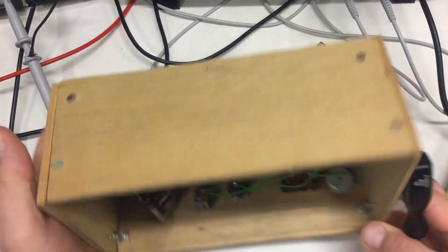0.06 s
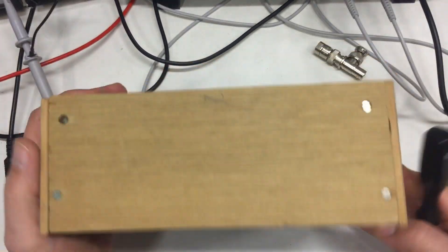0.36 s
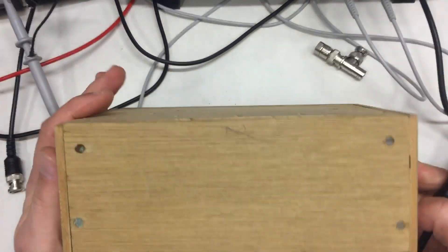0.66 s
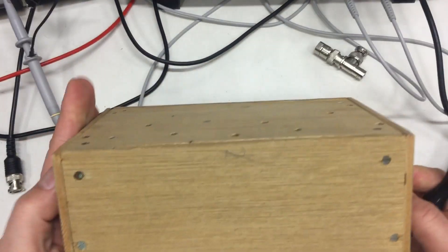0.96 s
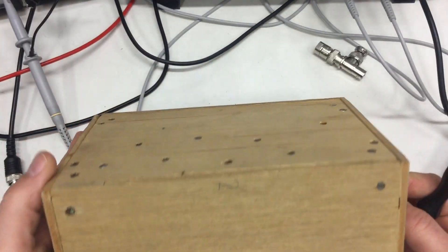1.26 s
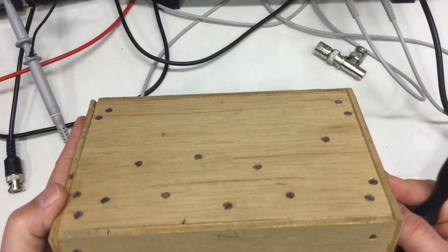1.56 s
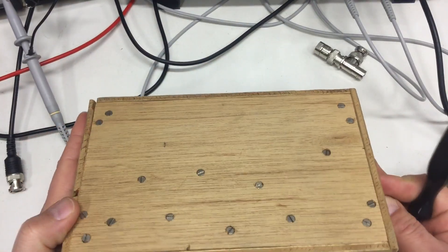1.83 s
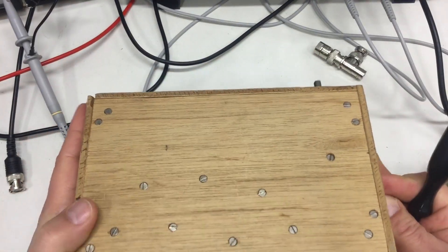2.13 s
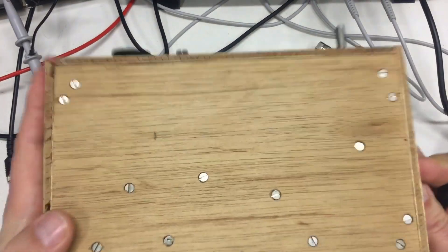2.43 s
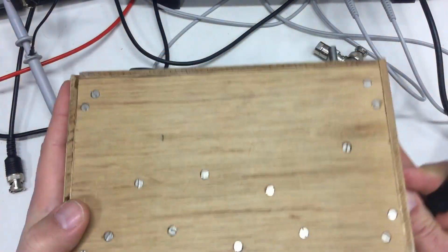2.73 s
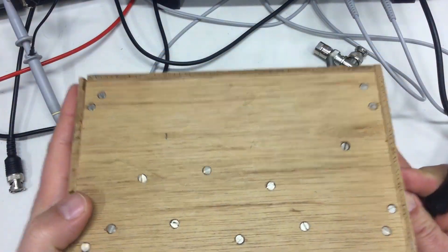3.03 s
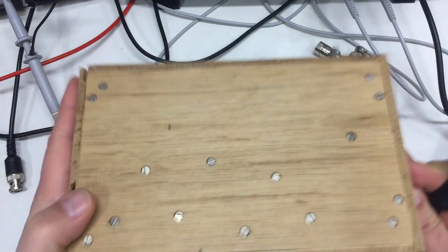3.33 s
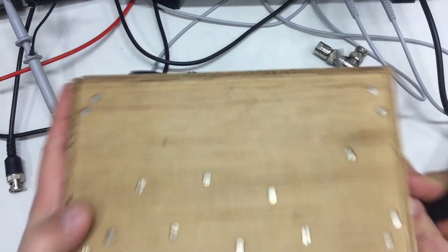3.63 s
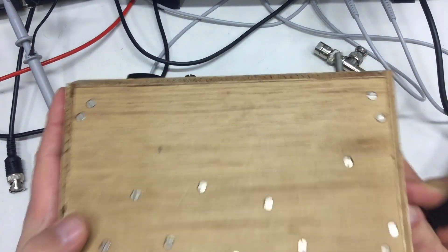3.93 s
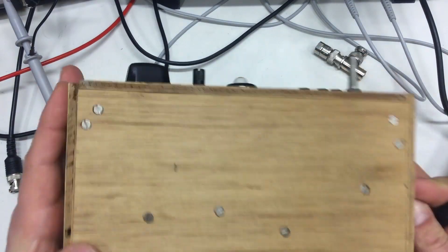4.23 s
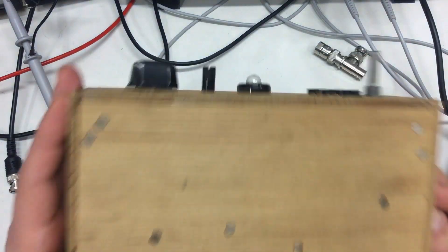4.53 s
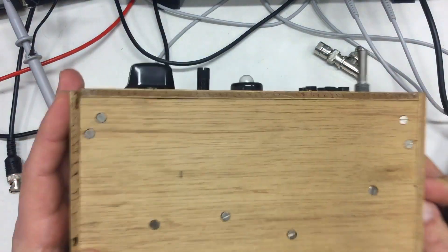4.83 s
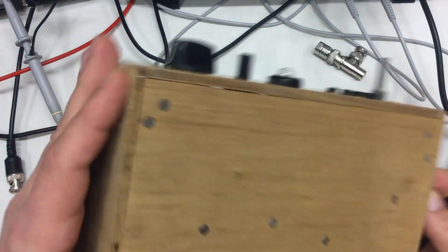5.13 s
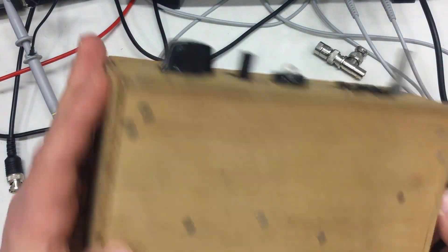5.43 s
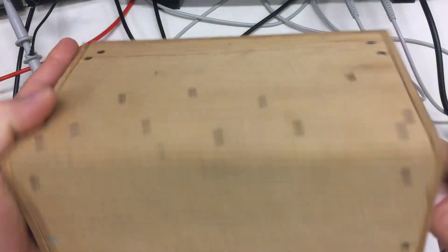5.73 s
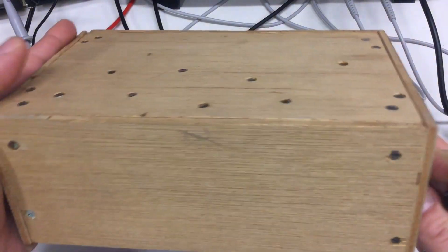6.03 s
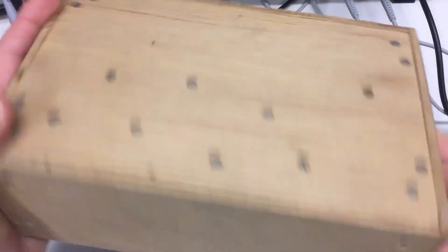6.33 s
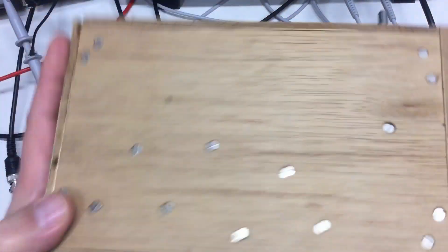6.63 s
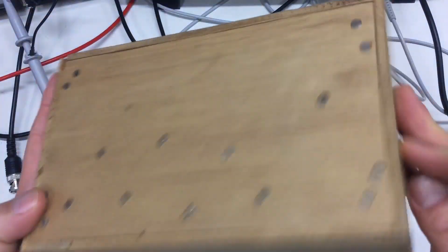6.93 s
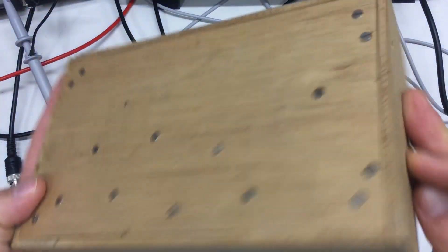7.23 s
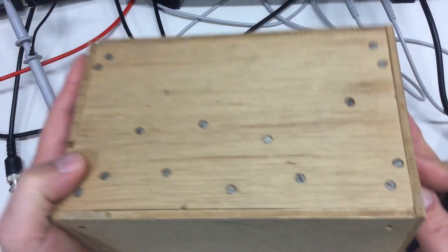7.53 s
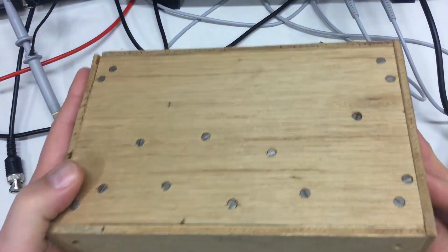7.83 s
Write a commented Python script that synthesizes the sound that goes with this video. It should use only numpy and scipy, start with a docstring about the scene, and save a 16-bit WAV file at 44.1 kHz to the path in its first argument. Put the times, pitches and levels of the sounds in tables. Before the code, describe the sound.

A hollow wooden box is turned over in the hands, close to the microphone in a quiet room, heard on the left only. In the first second, loose metal hardware slides and clinks against the panels, with several dull, hollow knocks. Another small rattle comes around 1.7 to 2.1 seconds. From 2.5 to 3.1 seconds the parts skid and bounce more sharply, with a thin, high ring. Then it eases to faint ticks and taps, with fingers and palms softly brushing the wood. At 5.9 seconds a sharp clink rings brightly and bounces a few times. Light taps lead into a last tumble from 7 to 7.6 seconds, with the hardest hit at about 7.2 and thin ringing trailing after it. A brief rub of the hand comes near 7.8 seconds. A faint low rumble lies underneath throughout.

```python
"""Wooden box with loose hardware

A hollow wooden box is turned over in the hands above a bench, close to one microphone. A loose bracket
and nuts slide, drop and bounce against its panels, and ring thinly while they tumble free. There are a
few duller knocks, and fingers rub on the wood. Only the left channel carries sound."""
import sys
import numpy as np
from scipy import signal
from scipy.fft import rfft, irfft
from scipy.io import wavfile
from scipy.ndimage import uniform_filter1d

SR = 44100
rng = np.random.default_rng(int(sys.argv[2]) if len(sys.argv) > 2 else 0)


def log_audio(samples):
    """Write samples as a 16-bit WAV file to the path given in sys.argv[1]."""
    # one column per channel
    frames = np.atleast_2d(samples).T
    # limit to full scale, then quantise
    limited = np.clip(frames, -1, 1)
    pcm = np.round(limited * 32767).astype(np.int16)
    wavfile.write(sys.argv[1], SR, pcm)


N = 352171
TIME = np.arange(N) / SR


def gain_of(db):
    """Decibels to amplitude."""
    return 10 ** (np.asarray(db) / 20)


def unit_rms(x):
    """Scales to an rms of one."""
    return x / np.sqrt(np.mean(x ** 2) + 1e-20)


def curve_at(points, hz):
    """Reads a curve on a log-frequency axis."""
    point_hz, value = np.transpose(points)
    return np.interp(np.log(hz + 1), np.log(point_hz + 1), value)


def add(mix, start_s, sound):
    """Mixes a sound in at its start time."""
    part = mix[max(round(start_s * SR), 0):][:len(sound)]
    part += sound[:len(part)]


def band(x, low_hz, high_hz, order=3):
    """Causal band-pass along the last axis."""
    return signal.sosfilt(signal.butter(order, [low_hz, high_hz], "band", fs=SR, output="sos"), x)


def resonate(x, hz, width_hz):
    """One resonance with a peak gain of one."""
    return signal.lfilter(*signal.iirpeak(hz, hz / width_hz, fs=SR), x)


def equalise(x, curve):
    """Applies an EQ curve of (Hz, dB) points."""
    return irfft(rfft(x) * gain_of(curve_at(curve, np.fft.rfftfreq(len(x), 1 / SR))), len(x))


def drift(step_s, count=800):
    """A slow random curve that reaches a new value at every step."""
    return np.interp(TIME, step_s * np.arange(count), rng.standard_normal(count))


def at_level(bursts, db):
    """Sets the rms of the first 8 ms of each burst."""
    attack = bursts[..., :round(.008 * SR)]
    return bursts * gain_of(db) / np.sqrt(np.mean(attack ** 2, axis=-1, keepdims=True) + 1e-20)


# The fader ride of the rumble. Each row: time in seconds, level in dB.
RUMBLE_RIDE = [(0.0, -81), (0.64, -74), (1.78, -72.5), (2.53, -73), (3.25, -77), (3.58, -67), (4.25, -77),
               (4.67, -73), (4.89, -69.5), (5.71, -77.5), (6.09, -70), (6.78, -75.5), (7.3, -69),
               (7.99, -73)]
# The EQ of the rumble and of the room tone. Each row: frequency in Hz, gain in dB.
RUMBLE_EQ = [(15, -7), (40, -5), (66, 1), (95, -0.5), (125, -2), (155, -26), (300, -24.5), (600, -62.5)]
AIR_EQ = [(100, -1), (170, -4.5), (198, 15), (225, -11), (290, -15.5), (330, 15), (380, -17.5), (900, -9.5),
          (2000, -9.5), (3200, -16), (15000, -10.5)]


def background(rumble_trim_db=2, lumps_db=2, air_db=-72):
    """A bed of lumpy rumble from the moving hands and the room, with quiet room tone."""
    rumble_db = np.interp(TIME, *np.transpose(RUMBLE_RIDE)) + lumps_db * drift(step_s=.12)
    rumble = unit_rms(equalise(rng.standard_normal(N), RUMBLE_EQ))
    air = unit_rms(equalise(rng.standard_normal(N), AIR_EQ))
    return gain_of(rumble_db + rumble_trim_db) * rumble + gain_of(air_db) * air


# The tone of the reverb. Each row: frequency in Hz, gain in dB.
REVERB_EQ = [(150, -7.5), (600, -4), (1800, -10.5), (4000, -6.5), (8000, -10), (14000, -22.5)]
# Its length. Each row: frequency in Hz, t60 in seconds.
REVERB_DECAY = [(200, 0.33), (700, 0.26), (2000, 0.25), (6000, 0.22), (14000, 0.16)]


def reverb(ringing, rattle, build_s=0.003, early_db=4, early_s=0.02, turn_hz=.9, scatter=.13):
    """Dense reflections in the box and the room; three tails crossfade as the box turns."""
    out, turn = np.zeros(N), 2 * np.pi * turn_hz * TIME
    # Each micro-impact takes its own paths, so a rattle's tail is diffuse.
    wander = uniform_filter1d(scatter * np.cumsum(rng.standard_normal(N)), size=40)
    for side in 2 * np.pi * np.arange(3) / 3:
        hz, frame_s, noise = signal.stft(rng.standard_normal(SR // 2), SR, nperseg=256)
        decay = gain_of(-60 * frame_s / curve_at(REVERB_DECAY, hz)[:, None])
        tail = signal.istft(noise * decay, SR, nperseg=256)[1]
        t = np.arange(len(tail)) / SR
        tail *= (1 - np.exp(-(t / build_s) ** 2)) * gain_of(early_db * np.exp(-t / early_s))
        tail = equalise(tail / np.linalg.norm(tail), REVERB_EQ)
        send = ringing * np.cos(turn + side) + band(rattle * np.cos(wander + side), 380, 18000, order=2)
        out += np.sqrt(2 / 3) * signal.oaconvolve(send, tail[:SR * 2 // 5])[:N]
    return out


# The hollow voice of the box. Each row: mode frequency in Hz, level in dB, t60 in seconds.
BOX_MODES = [(199.3, -1, 0.22), (218, 3, 0.19), (250, 1, 0.1), (451, -4.5, 0.32), (587, -30, 0.15),
             (676, -5, 0.16), (910, -10.5, 0.12), (1008, -7.5, 0.27), (1126, -20, 0.152), (1394, -2, .15),
             (1570, -44, .14), (1760, -15, 0.29), (1897, -17.5, 0.14)]


def box_ring(lowest_hz=140):
    """The wooden box answers one blow; its ring is kept out of the deep bass."""
    t = np.arange(SR // 2) / SR
    modes = sum(gain_of(db - 60 * t / t60) * np.sin(2 * np.pi * hz * t) for hz, db, t60 in BOX_MODES)
    return band(modes, lowest_hz, 8000, order=2)


def through_box(x, ring_db):
    """A sound made on the panels also sets the box's modes ringing."""
    ring = box_ring()
    return x + gain_of(ring_db) * signal.oaconvolve(x, ring / np.linalg.norm(ring))[:N]


# A palm changes its grip. Each row: start and end in seconds, level in dB, low and high cut in Hz.
PALM_SWIPES = [(1.036, 1.383, -62.5, 1500, 12400), (4.14, 4.26, -67, 1970, 12150),
               (5.285, 5.394, -63, 1270, 6500), (5.393, 5.533, -61.5, 1500, 7000),
               (5.601, 5.83, -63, 1350, 5800), (6.253, 6.377, -63.5, 6940, 14000),
               (7.719, 7.842, -57.5, 485, 1760), (7.82, 7.898, -60.5, 900, 4840)]


def palm_swipes():
    """Skin slides smoothly along the wood: a soft swell of friction."""
    out = np.zeros(N)
    for start, end, db, low_hz, high_hz in PALM_SWIPES:
        friction = unit_rms(band(rng.standard_normal(SR // 2), low_hz, high_hz))
        friction = friction[:round((end - start) * SR)]
        add(out, start, gain_of(db) * friction * signal.windows.tukey(len(friction), .8))
    return out


# Loose parts skid as the box tilts. Each row: start and end in seconds, scrape and bounce levels in dB.
SKIDS = [(0.192, 0.431, -77, -56), (.6, 0.728, -51, -59), (.73, 0.885, -61, -54.5),
         (1.692, 1.904, -78, -59), (1.981, 2.056, -62, -71), (2.548, 2.658, -60, -55.5),
         (2.693, 2.956, -54.5, -68), (3.033, 3.126, -63, -64.5), (5.957, 6.203, -67, -55.5),
         (7.398, 7.628, -58, -61)]


def skid_envelope():
    """The scrape swells and fades as a part crosses a panel."""
    out = np.zeros(N)
    for start, end, db, _ in SKIDS:
        add(out, start, gain_of(db) * signal.windows.tukey(round((end - start) * SR), .8))
    return out


def light_contact(start, db, draws, hardness_db, depth_db, contact_s, scatter_db=4):
    """One row for clinks(), varied in force, hardness and the spot it strikes."""
    force, hard, wood, panel = draws
    db += scatter_db * (2 * force - 1)
    hardness_db += 2 * scatter_db * (2 * hard - 1)
    return start, db, hardness_db, depth_db, contact_s, 600 * 2 ** wood, 1650 + 450 * panel


def bounces(hops=4):
    """A skidding part hops a few times at random: rows for clinks()."""
    rows = []
    for start, end, _, db in SKIDS:
        for k, (when, *draws) in enumerate(rng.random((hops, 5))):
            landing = start + (end - start) * (k + when) / hops
            rows.append(light_contact(landing, db, draws, hardness_db=-3, depth_db=-7, contact_s=.0014))
    return rows


# How hard the fingers rub while they turn the box. Each row: time in seconds, level in dB.
RUB_RIDE = [(0, -48), (.07, -65.5), (.25, -50.5), (.45, -69), (.8, -69), (.95, -63.5), (1.22, -64),
            (1.55, -66.5), (1.88, -56.5), (2.13, -68.5), (2.5, -68.5), (2.85, -57), (3.15, -73),
            (3.58, -72), (3.82, -66), (4.25, -71.5), (4.72, -65.5), (5.25, -67), (5.56, -66), (5.82, -70.5),
            (6.08, -65.5), (6.28, -66.5), (6.62, -67.5), (7.08, -62.5), (7.45, -61), (7.679, -67.5),
            (7.99, -65.5)]
# The tone of friction on wood. Each row: frequency in Hz, gain in dB.
RUB_EQ = [(88, -31), (150, -0.5), (190, 3), (226, -9.5), (264, 1.5), (376, -5.5), (457, -3), (637, 0),
          (960, -4), (2020, -4), (2810, -15), (10200, -22.5), (16000, -8.5)]


def rubbing(slips_per_s=420, slip_share=0.88, slip_decay_s=0.012, slip_range_db=3.2):
    """Skin and metal slide over the wood grain in many tiny slips; the metal adds only rasp and hiss."""
    rub = gain_of(np.interp(TIME, *np.transpose(RUB_RIDE)) + drift(step_s=0.066))
    skid = skid_envelope()
    slipping = rng.random(N) < slips_per_s / SR
    slips = slipping * gain_of(slip_range_db * np.minimum(rng.exponential(1, N), np.pi))
    grip = unit_rms(signal.lfilter([1], [1, -np.exp(-1 / (slip_decay_s * SR))], slips))
    friction = equalise(rng.standard_normal(N) * (1 - slip_share + slip_share * grip), RUB_EQ)
    body = rub * unit_rms(through_box(band(friction, 237, 2400), ring_db=-19))
    rasp = np.hypot(gain_of(-7) * rub, skid) * unit_rms(band(friction, 2670, 8280, order=5))
    hiss = np.hypot(gain_of(-8) * rub, gain_of(-3) * skid) * unit_rms(band(friction, 7670, 12000, 5))
    return body + rasp + hiss


def jostles(count=36, over_rub_db=3):
    """Fingertips and shifting parts tap faintly, as hard as the hands are working: rows for clinks()."""
    rows = []
    for k, (when, *draws) in enumerate(rng.random((count, 5))):
        start = (k + when) / count * N / SR
        db = np.interp(start, *np.transpose(RUB_RIDE)) + over_rub_db
        rows.append(light_contact(start, db, draws, hardness_db=-12, depth_db=-1, contact_s=.0036))
    return rows


# Dull knocks with a short burst of low noise, and at 7.47 s a low rub played the same way; on two loud hits #
# it is the deep thud of the overloaded input. Each row: start in seconds, ring and burst levels in dB, burst #
# low cut in Hz, brightness in Hz, burst t60 in seconds, wall note in Hz, its level in dB.
KNOCKS = [(0.1542, -43, -32, 170, 1580, 0.12, 244, -43), (.167, -24.5, -42, 191, 1020, 0.031, 456, -35),
          (.21, -33.5, -44, 177, 800, 0.57, 205, -47), (.288, -30, -47, 190, 1470, .1, 253, -61),
          (0.6055, -24, -40, 257, 1290, 0.035, 433, -38), (0.615, -34, -35.5, 220, 1240, 0.23, 201, -34),
          (0.804, -29, -40, 151, 720, 0.11, 202.4, -41), (1.873, -35.5, -39.5, 184, 606, 0.017, 358, -42),
          (2.686, -52.5, -40, 45.1, 790, 0.071, 410, -42), (5.903, -65, -42.5, 55, 596, 0.021, 402, -41),
          (7.1836, -39, -47, 464, 1410, 0.067, 540, -42.5), (7.473, -72, -56, 128, 700, 0.43, 462, -58)]


def knocks(note_t60=0.13, ring_trim_db=-12.5):
    """A blow rings the box's modes, and the note of the struck wall, over a short burst of low noise."""
    t, ring, out = np.arange(SR // 2) / SR, box_ring(), np.zeros(N)
    for start, ring_db, burst_db, low_hz, bright_hz, t60, note_hz, note_db in KNOCKS:
        burst = band(rng.standard_normal(len(t)) * gain_of(-60 * t / t60), low_hz, bright_hz)
        body = signal.lfilter(*signal.butter(1, bright_hz, fs=SR), ring)
        note = gain_of(note_db - 60 * t / note_t60) * np.sin(2 * np.pi * note_hz * t)
        add(out, start, at_level(burst, burst_db) + gain_of(ring_db + ring_trim_db) * body + note)
    return out


# The pitches of the three loose metal parts. Each row: lower and upper mode in Hz.
PART_MODES = [(8439, 12992), (8802, 13488), (7607, 11233)]
# Their sustain. Each row: t60 of the lower and upper mode in seconds.
PART_DECAYS = [(0.75, .4), (0.29, 0.7), (1, 0.86)]
# Thin ringing between contacts. Each row: start and end in seconds, part index,
# levels of the lower and upper mode in dB, beat rate of the lower mode in Hz.
TUMBLES = [(.655, .765, 2, -42, -51, 12), (1.809, 1.84, 2, -68, -52, 18), (2.54, 2.687, 0, -49, -57, 23),
           (2.688, 2.714, 0, -35, -60, 28), (2.703, 2.821, 0, -41, -40, 9), (3.714, 3.76, 2, -63, -57, 18),
           (3.833, 3.865, 2, -70, -52, 18), (5.918, 6.037, 1, -30, -41, 33),
           (6.037, 6.104, 1, -50, -62, 14), (6.104, 6.19, 1, -49, -65, 12), (6.979, 7.18, 2, -64, -60, 14),
           (7.183, 7.24, 2, -46, -54, 20), (7.236, 7.363, 2, -47, -54, 15), (7.363, 7.606, 2, -52, -55, 14),
           (7.606, 7.81, 2, -53, -47, 11)]


def tumbling_metal(damping_s=0.0014, upper_beat_ratio=0.84, pair_share=.42):
    """A free part rings in two modes, turning its faces to and from the microphone, until it lands."""
    out = np.zeros(N)
    for start, end, part, lower_db, upper_db, beat_hz in TUMBLES:
        flight_s = end - start
        t = np.arange(0, flight_s + 10 * damping_s, 1 / SR)
        gate = (1 - np.exp(-t / damping_s)) * np.exp(-np.maximum(t - flight_s, 0) / damping_s)
        rates = beat_hz, beat_hz * upper_beat_ratio
        for hz, t60, db, rate in zip(PART_MODES[part], PART_DECAYS[part], (lower_db, upper_db), rates):
            spin = np.exp(1j * np.pi * rate * t)
            pair = (1 - pair_share) / spin - pair_share * spin  # spin splits a mode into a beating pair
            tone = np.sqrt(2) * (pair * np.exp(2j * np.pi * (hz * t + rng.random()))).real
            add(out, start, gain_of(db - 60 * t / t60) * gate * tone)
    return out


# The four layers of a clink: wood, panel, clack, tick. Each row: low and high cut in Hz,
# t60 in seconds, resonance width in Hz, resonance level over the noise in dB.
CLINK_LAYERS = [(415, 1860, 0.044, 48, 4), (1470, 2490, 0.086, 140, 7.5), (2780, 7300, 0.02, 270, -7.5),
                (7560, 14200, 0.0049, 2500, -5)]
# Metal strikes the panels; hardness lifts the tick and clack, depth lifts the low wood. Each row: start
# in seconds, strength, hardness and depth in dB, contact time in seconds, wood and panel notes in Hz.
CLINKS = [(0.154, -46, -3, 12.5, 0.0027, 600, 1640), (0.1743, -47, -1, 12, 0.0024, 664, 1570),
          (0.2876, -30.5, -9, -5.5, 0.0015, 670, 2500), (0.3482, -48.5, 9, -7, 0.0021, 680, 2020),
          (0.4188, -54, -20, -2, 0.0022, 650, 2530), (0.5012, -49, -53, -5, 0.0079, 674, 1720),
          (0.526, -54.5, -30, -11.5, 0.0027, 1240, 1700), (0.574, -58.5, 17.5, 10, 0.0037, 650, 1530),
          (0.5873, -41, 10, -7, 0.0016, 670, 1590), (0.6052, -38, -5.5, 9, 0.0072, 973, 1440),
          (0.6152, -41.5, 3, 2, 0.012, 670, 1480), (0.635, -45.5, 7, -1.5, 0.009, 670, 1970),
          (0.6535, -51, 11, 5, 0.004, 920, 1420), (0.6613, -46, 4.5, -3, 0.0011, 635, 1670),
          (0.702, -53, 6, -10, 0.0022, 540, 2740), (0.7286, -48.5, 4, -3, 0.0005, 1060, 2040),
          (0.7628, -50, -1, -3, 0.0011, 1100, 1990), (0.7885, -47, 12.5, -6, 0.00085, 1070, 1710),
          (0.8303, -47, -1, -1, 0.0012, 660, 2120), (1.7029, -55, -20, 2.5, 0.015, 625, 1810),
          (1.7495, -44.5, -2.5, -2.5, 0.0066, 624, 2230), (1.7646, -40.5, -14, -5.5, 0.0039, 1310, 2040),
          (1.7738, -56, -3, -15, 0.0025, 610, 1760), (1.8073, -48, -2.5, -15, 0.0038, 730, 1980),
          (1.8381, -46, -14, -13, 0.0068, 1260, 1720), (1.8473, -43.5, -14, -16, 0.0056, 880, 1690),
          (1.907, -37.5, 13, -7, 0.00074, 1360, 2140), (1.9645, -44.5, 3, -14, 0.0011, 1090, 1610),
          (2.0101, -51.5, 10.5, -15, 0.0015, 1090, 1580), (2.03, -62, 8, -4, 0.0011, 527, 1960),
          (2.049, -57, 8.5, -13, 0.0014, 1145, 2400), (2.0818, -61, 6, -11, 0.001, 536, 1970),
          (2.2948, -79, -32, 17.5, 0.0034, 980, 1800), (2.503, -53, -3, -8, 0.0036, 675, 1920),
          (2.5381, -48, 9, -9, 0.0024, 845, 2680), (2.5888, -40, 5, -12, 0.0042, 1320, 1780),
          (2.6027, -39, -28, -14, 0.0026, 690, 1830), (2.6873, -27, 4.5, -8, 0.0016, 875, 1950),
          (2.795, -38, 1, -1, 0.0015, 1320, 1610), (2.8208, -36, 15.5, -2.5, 0.00092, 1024, 1640),
          (2.8664, -42.5, -5, -25, 0.00091, 1070, 1660), (2.9547, -43.5, 17, -11.5, 0.0013, 580, 2390),
          (3.0344, -48.5, 18, -1, 0.0015, 1060, 1760), (3.0437, -48, 4, -7, 0.0012, 1080, 1790),
          (3.0692, -55, 2, -13, 0.0015, 1070, 1800), (3.0848, -57.5, 13.5, -3, 0.003, 1070, 1870),
          (3.1305, -58.5, 5.5, -6, 0.0048, 1030, 1880), (3.1762, -61, 11.5, -21, 0.0029, 630, 1900),
          (3.2185, -62, 16.5, -25, 0.0011, 650, 1890), (3.2543, -58, 15, -1, 0.002, 1095, 1840),
          (3.3653, -56.5, 3.5, -2, 0.0042, 867, 1860), (3.5519, -59.5, 2, -11.5, 0.003, 856, 1900),
          (3.7117, -55.5, 3, -1, 0.0068, 670, 1850), (3.7331, -43.5, -8.5, -12, 0.0047, 595, 1800),
          (3.8307, -53, -6, -5, 0.0074, 1210, 1870), (3.868, -54.5, 3, -1, 0.0053, 675, 1700),
          (4.022, -57, -3, -1, 0.0047, 713, 1670), (4.1214, -63.5, -3.5, 6.5, 0.004, 630, 2090),
          (4.1912, -61, -8, -3, 0.0065, 850, 1910), (4.3881, -62.5, -1.5, -18, 0.0046, 540, 1670),
          (4.4999, -57.5, -11, -4.5, 0.0038, 750, 2460), (4.5477, -49.5, -8, -2.5, 0.0075, 950, 1840),
          (4.5691, -50, 4.5, -3.5, 0.008, 750, 1910), (4.642, -52.5, -2.5, -5, 0.0029, 870, 1880),
          (4.6974, -53.5, -6.5, -2, 0.0019, 850, 1930), (4.8384, -55, -17, -6, 0.007, 880, 1830),
          (4.8541, -54, -6.5, -7, 0.0027, 580, 1980), (5.0038, -57, -14.5, -14.5, 0.0032, 870, 1980),
          (5.0346, -55.5, -34, -16, 0.0035, 880, 2700), (5.6395, -56.5, -14, -19, 0.0047, 685, 1950),
          (5.7407, -53.5, -5, -5, 0.0059, 862, 1760), (5.7716, -51.5, 9, 3, 0.0039, 645, 1800),
          (5.9011, -28, -3, -25, 0.00042, 830, 1690), (5.9034, -29, 5, -5, 0.00046, 875, 1620),
          (5.988, -63.5, 2, 16.5, 0.0021, 635, 1980), (6.0373, -31, -6.5, -7, 0.001, 1160, 2000),
          (6.1044, -43.5, -6.5, -15, 0.0023, 1150, 2030), (6.1226, -51, -16, -8, 0.0018, 1120, 1980),
          (6.1643, -42, -7, -6, 0.0011, 1160, 2010), (6.6085, -54, -2.5, -3.5, 0.0042, 855, 1810),
          (6.6509, -58.5, 2, -2, 0.0038, 860, 2630), (6.691, -49.5, 5.5, -6.5, 0.0045, 630, 1860),
          (6.766, -53.5, -18, -4.5, 0.014, 846, 1900), (6.837, -58, 10.5, -9, 0.004, 910, 1740),
          (6.8496, -48.5, 5, -4, 0.0045, 720, 1770), (6.9256, -62, -23, -8, 0.0027, 775, 1940),
          (6.9775, -49.5, 1, 1.5, 0.01, 796, 1990), (6.993, -60, 6, 7, 0.004, 640, 2000),
          (7.0089, -49, -8.5, -3, 0.0056, 630, 1700), (7.0388, -52.5, -1, 3, 0.0053, 1310, 1790),
          (7.065, -32, -24, -4.5, 0.00083, 920, 1810), (7.1824, -23.5, -4, 3.5, 0.0015, 1193, 1390),
          (7.3625, -29, -6.5, -8.5, 0.0037, 1250, 1760), (7.3687, -35.5, -10.5, -26, 0.0021, 1300, 1850),
          (7.4279, -49, -2, -7, 0.0044, 1020, 2800), (7.4725, -49, 6, -2, 0.0064, 1015, 1720),
          (7.5156, -49.5, -2, -8, 0.01, 920, 1700), (7.5496, -52, 3, -16, 0.0021, 544, 1670),
          (7.5915, -52, 7, -9, 0.0039, 1080, 2480), (7.6049, -51.5, -2.5, -11, 0.0049, 1050, 1650),
          (7.7953, -57, -29, -8, 0.00068, 880, 2920), (7.8324, -57, -30, 7.5, 0.01, 1000, 1574)]


def clinks(contacts, rise_share=0.014, chatter=0.46, light_db=-52, resonance_loss=0.12):
    """Each contact is a burst of micro-impacts; the panel's low resonances outlast the bright tick."""
    starts, strength, hardness, depth, contact_s, wood_hz, panel_hz = np.transpose(contacts)
    clack_db, tick_db = strength + 0.31 * hardness - .5, strength + hardness
    clack_hz = np.clip(4650 + 170 * hardness, 3100, 7400)  # harder contacts clack and tick higher
    tick_hz = 13500 + 75 * tick_db
    levels = [strength + depth, strength, clack_db, tick_db]
    centres = [wood_hz, panel_hz, clack_hz, tick_hz]
    t, contact_s = np.arange(3000) / SR, contact_s[:, None]
    noise = rng.standard_normal((len(starts), len(CLINK_LAYERS) + 1, len(t)))
    impacts = np.exp(chatter * 4 * uniform_filter1d(noise[:, -1], size=16, axis=1))  # uneven grip
    hits, out = 0, np.zeros(N)
    for k, (low_hz, high_hz, t60, width_hz, resonance_db) in enumerate(CLINK_LAYERS):
        level = levels[k][:, None]
        fade_s = np.hypot(contact_s, t60 / np.log(1000))
        force = noise[:, k] * impacts * (1 - np.exp(-t / (rise_share * contact_s)))
        burst = band(force * np.exp(-t / fade_s), low_hz, high_hz)
        strikes = force * np.exp(-t / np.sqrt(contact_s * fade_s))
        notes = np.array([resonate(strike, hz, width_hz) for strike, hz in zip(strikes, centres[k])])
        # A hard blow wakes many modes alike, so its note stands out less.
        note_db = resonance_db - resonance_loss * np.maximum(level - light_db, 0)
        hits = hits + at_level(at_level(burst, 0) + at_level(notes, note_db), level)
    for start, hit in zip(starts, hits):
        add(out, start, hit)
    return out


def scene():
    """The mix at the microphone; the right channel is silent."""
    rattle = clinks(list(CLINKS) + bounces() + jostles())
    wood, metal = knocks(), tumbling_metal()
    hands = rubbing() + palm_swipes()
    direct = through_box(rattle, ring_db=-21) + wood + metal + hands
    mix = direct + reverb(wood + gain_of(-1.5) * metal, rattle) + background()
    return np.array([2 * mix, np.zeros(N)])


def record(dry, cutoff_hz=16100):
    """The sharpest ticks overload the input; a steep low-pass then trims the top."""
    low_pass = signal.firwin(255, cutoff_hz, window=("kaiser", 8), fs=SR)
    return signal.oaconvolve(np.clip(dry, -1, 1), low_pass[None], "same")


dry = scene()
out = record(dry)
log_audio(out)
```